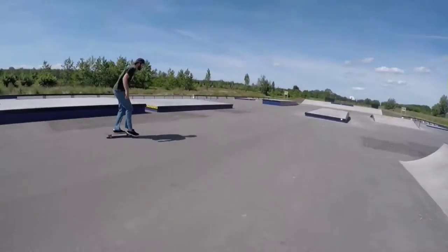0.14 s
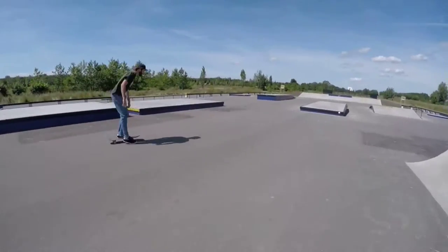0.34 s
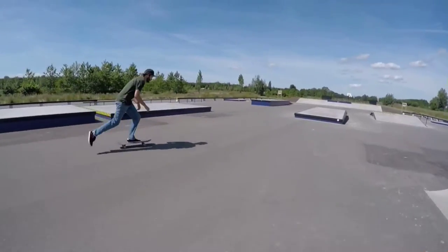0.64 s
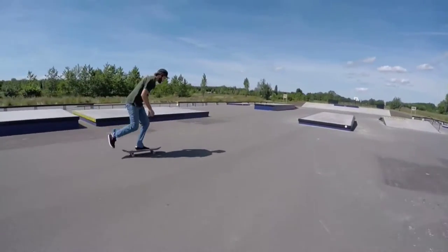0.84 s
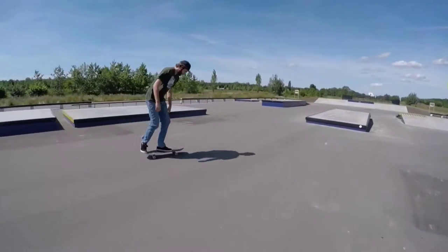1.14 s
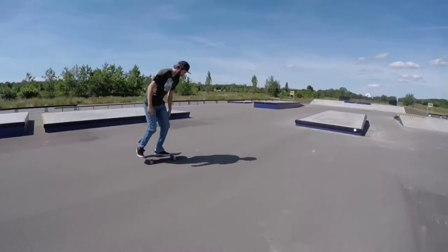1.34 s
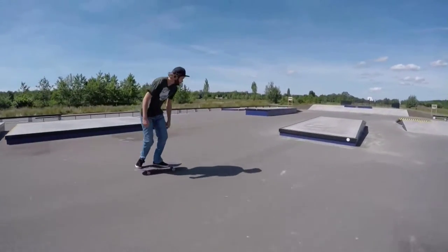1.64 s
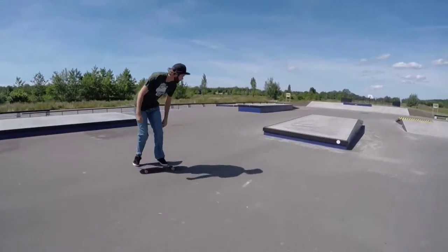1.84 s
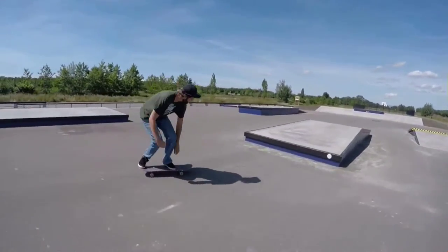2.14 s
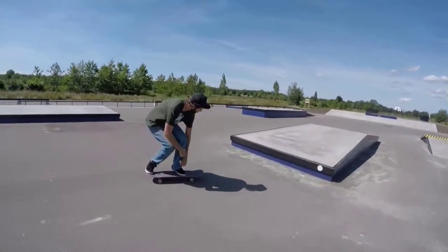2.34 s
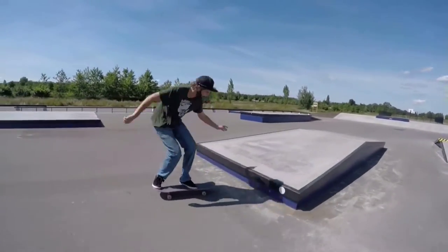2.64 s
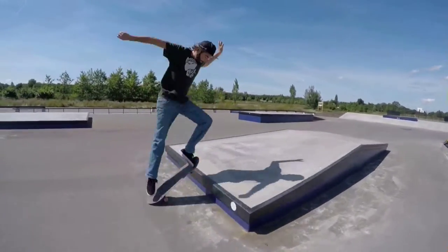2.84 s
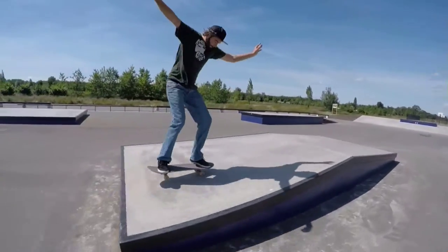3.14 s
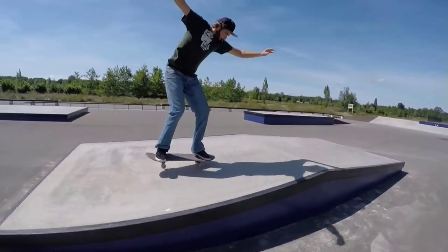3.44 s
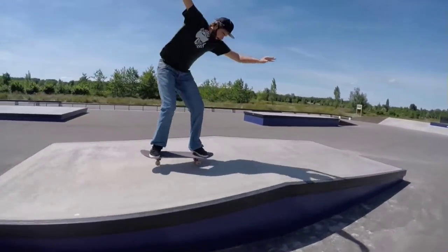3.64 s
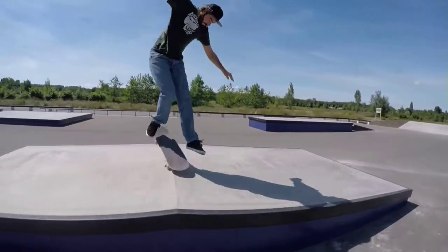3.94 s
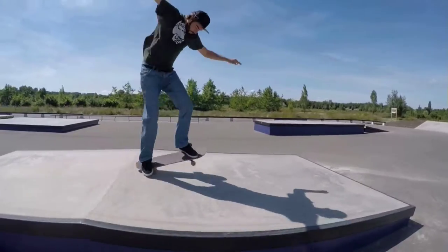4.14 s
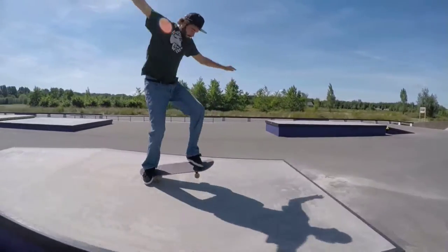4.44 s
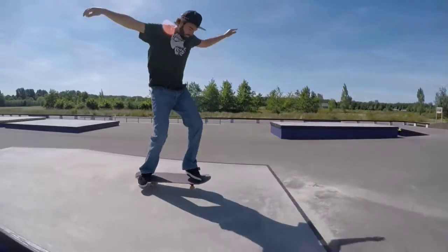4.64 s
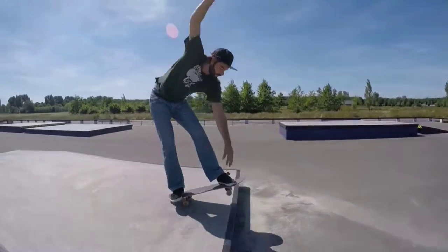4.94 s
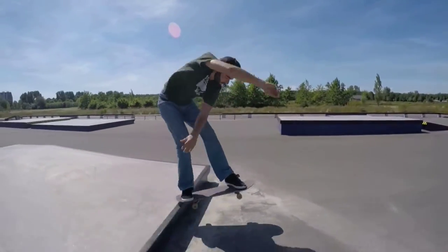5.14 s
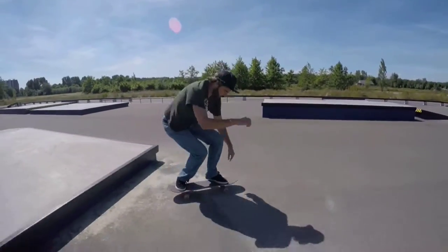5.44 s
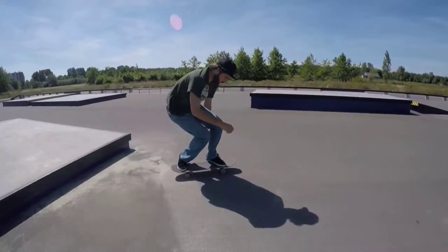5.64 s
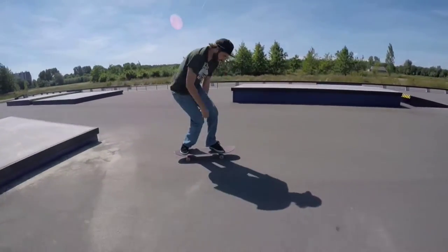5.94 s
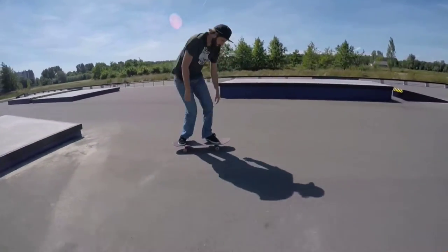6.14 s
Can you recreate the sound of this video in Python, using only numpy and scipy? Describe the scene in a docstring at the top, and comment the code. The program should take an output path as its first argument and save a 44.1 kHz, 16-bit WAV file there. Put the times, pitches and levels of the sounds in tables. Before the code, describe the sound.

Loud plastic clicks and rasps of a camera case rattle over a skateboard's quiet rolling on concrete, with a few clacking board hits outdoors.

```python
"""Skateboarding with a hand-held camera

A skateboarder rolls over smooth concrete, hops onto a low ledge, flips the board and drops off again.
A hand-held action camera follows: its plastic case knocks and chafes in the mount, far louder than the board.
Sharp pushes ring the case; tiny slips make it rasp. Board blows are bursts of noise over a low thud.
Wheels, shoes, clothes, wind and a faint hiss are coloured noise.
"""
import sys
import numpy as np
from scipy import signal
from scipy.fft import rfft, irfft
from scipy.io import wavfile

SR = 44100
rng = np.random.default_rng(int(sys.argv[2]) if len(sys.argv) > 2 else 0)


def master(y):
    """Save y as 16-bit WAV."""
    cut = np.clip(np.atleast_2d(y).T, -1, 1)
    pcm = np.round(cut * 32767)  # scale
    wavfile.write(sys.argv[1], SR, pcm.astype(np.int16))


N = 277830  # samples, 6.3 s
TIME = np.arange(N) / SR


def from_db(db):
    """Decibels to gain."""
    return 10 ** (np.asarray(db) / 20)


def rms_one(x):
    """Scale to an average (rms) strength of 1."""
    return x / np.sqrt(np.mean(x ** 2) + 1e-20)


def in_time(rows):
    """One curve per column, joined by straight lines."""
    s, *columns = np.transpose(rows)
    return [np.interp(TIME, s, column) for column in columns]


def add(out, s, sound):
    """Mix a sound in at its moment."""
    start = max(round(s * SR), 0)
    out[start:start + len(sound)] += sound[:max(N - start, 0)]


def butter(hz, kind, order=2):
    """Sections of a Butterworth low- or high-pass filter."""
    return signal.butter(order, min(hz, .45 * SR), kind, fs=SR, output="sos")


def cut(x, hz, kind, order=2):
    """Low- or high-pass a sound."""
    return signal.sosfilt(butter(hz, kind, order=order), x)


def drift(rate):
    """Smooth chance with spread 1, changing about rate times a second."""
    steps = 4096
    hz = np.fft.rfftfreq(steps, N / SR / steps)
    spectrum = rfft(rng.standard_normal(steps))
    slow = irfft(spectrum / (1 + (hz / rate) ** 2))
    return np.interp(TIME, np.linspace(0, N / SR, steps), rms_one(slow))


def noise(spectrum):
    """Noise of a given colour that falls away beyond its ends; rms 1."""
    hz = np.fft.rfftfreq(N, 1 / SR) + 1e-3  # avoids log(0)
    at, db = np.transpose(spectrum)
    colour = from_db(np.interp(np.log(hz), np.log(at), db))
    ends = np.minimum(1, np.minimum(hz / at[0], at[-1] / hz)) ** 2
    return rms_one(irfft(rfft(rng.standard_normal(N)) * colour * ends, N))


def resonate(x, hz, width_hz):
    """A resonance with gain 1 at its top; a narrower one rings longer."""
    r = np.exp(-np.pi * width_hz / SR)
    top = np.array([1, 0, -1]) * (1 - r * r) / 2
    ringing = [1, -2 * r * np.cos(2 * np.pi * hz / SR), r * r]
    return signal.lfilter(top, ringing, x + 1e-18)


def stroke(s, length, power=2):
    """Samples and gain of one stroke, at half height over its length; a higher power flattens its top."""
    near = slice(max(int((s - 2 * length) * SR), 0), int((s + 2 * length) * SR))
    return near, .5 ** (np.abs(2 * (TIME[near] - s) / length) ** power)


def hiss(level_db=-68.0, hz=4100, width_hz=800):
    """A faint steady hiss with a narrow, boxy colour: noise through the same resonance twice."""
    once = resonate(rng.standard_normal(N), hz, width_hz)
    return from_db(level_db) * rms_one(resonate(once, hz, width_hz))


# air on the microphone: (time [s], relative buffeting level [dB], relative flutter level [dB])
WIND_LEVELS = [(0, -31, -39.5), (.3, -37, -42), (.75, -40.5, -39.5), (1.1, -41.5, -42.5),
               (2.4, -39.5, -40.5), (3.15, -40.5, -44.5), (3.8, -35, -38), (4.4, -35, -40),
               (5.15, -35.5, -45), (5.47, -31.5, -44), (5.8, -33.5, -45), (5.95, -29, -42),
               (6.16, -51, -48), (6.3, -33.5, -52)]
# colour of the slow buffeting: (frequency [Hz], relative density [dB per Hz])
BUFFET_COLOUR = [(15, -17), (30, -3), (50, -11.5), (80, -17.5), (160, -50)]
# colour of the quicker flutter: (frequency [Hz], relative density [dB per Hz])
FLUTTER_COLOUR = [(40, -8.5), (75, 0.5), (110, -2), (170, -3.5), (250, -14), (400, -27), (700, -42),
                  (1500, -24)]


def wind(buffet_level_db=2.0, flutter_level_db=0.0, lumpy_db=3.0):
    """Slow buffeting and a quicker, lumpy flutter of the air stream."""
    buffet_db, flutter_db = in_time(WIND_LEVELS)
    buffet = from_db(buffet_db + buffet_level_db) * noise(BUFFET_COLOUR)
    flutter_gain = from_db(flutter_db + flutter_level_db + lumpy_db * drift(37))
    return buffet + flutter_gain * noise(FLUTTER_COLOUR)


# shoes and clothes brush: (middle time [s], relative level [dB], length at half height [s])
BRUSH_STROKES = [(0.018, -30.5, 0.039), (0.259, -42.5, 0.031), (0.43, -51.5, 0.075), (0.759, -41, 0.06),
                 (0.879, -49, 0.1), (5.938, -48, 0.028), (6.281, -45.5, 0.1)]
# colour of the brushing: (frequency [Hz], relative density [dB per Hz])
BRUSH_COLOUR = [(400, -19), (900, 3), (1600, 0), (3800, -3), (5500, -11), (8500, -16.5), (12500, -19.5),
                (16000, -26)]


def brushes(level_db=0.0, grain_db=-1.5):
    """Soles and cloth give short grainy swishes."""
    gain = np.zeros(N)
    for s, db, length in BRUSH_STROKES:
        near, shape = stroke(s, length, power=2.8)
        gain[near] += from_db(db) * shape
    grain = from_db(level_db + grain_db * drift(140))
    return gain * grain * noise(BRUSH_COLOUR)


# wheels on concrete: (time [s], relative roar level [dB], relative grit hiss level [dB])
ROLL_LEVELS = [(0, -42.5, -50.5), (1.1, -44, -60), (1.5, -45, -56), (2.2, -43.5, -61), (2.75, -47.5, -53.5),
               (3.14, -47, -59), (4.45, -48, -60), (4.85, -49, -48.5), (5.15, -48, -57),
               (5.52, -46.5, -49.5), (5.85, -49, -56.5), (6.3, -54, -62)]
# colour of the roar: (frequency [Hz], relative density [dB per Hz])
ROAR_COLOUR = [(300, 11), (550, 0.5), (900, 9.5), (1300, 6), (1850, 10), (2400, 3.5), (3200, -9),
               (4000, 3.5), (5000, -34), (7000, -49)]
# colour of the grit: (frequency [Hz], relative density [dB per Hz])
GRIT_COLOUR = [(3000, 13.5), (5500, 1), (6800, -2.5), (8200, -7.5), (11000, -6), (16000, -7)]


def wheels(roar_level_db=-7.0, grit_level_db=-5.5, uneven_db=6.0, grain_db=2.5):
    """Wheels roar on the concrete, wavering with the surface, and crackle on its grit."""
    roar_db, grit_db = in_time(ROLL_LEVELS)
    roar = from_db(roar_db + roar_level_db + uneven_db * drift(22.4)) * noise(ROAR_COLOUR)
    grit = from_db(grit_db + grit_level_db + grain_db * drift(120)) * noise(GRIT_COLOUR)
    return roar + grit


# board and shoes hit the concrete: (time [s], relative clatter level [dB],
# clatter's time to fade by 60 dB [s], thud level [dB], thud pitch [Hz])
BOARD_BLOWS = [(0.726, -51, .08, -21, 175), (3.063, -29.5, 0.094, -29, 294),
               (3.074, -26.5, 0.015, -35, 265), (4.166, -29.5, 0.078, -41, 212),
               (5.321, -21, 0.058, -58, 300), (5.327, -26, 0.025, -20, 227),
               (5.333, -22.5, 0.057, -57, 218), (5.934, -27.5, 0.035, -30, 128)]
# colour of deck and wheels on concrete: (frequency [Hz], relative density [dB per Hz])
CLACK_COLOUR = [(300, -10.5), (500, -16.5), (850, -14.5), (1200, -3), (1600, -6), (2100, -6), (2600, -15),
                (3900, -13.5), (6500, -30.5), (8300, -31), (16000, -48)]


def board(clatter_db=5.0, thud_width_hz=50, tail_db=-24, tail_t60=0.075):
    """A blow is a dying clatter of deck and wheels over a low thud, with a faint tail off the concrete."""
    out = np.zeros(N)
    t = TIME[:SR // 3]
    clack = noise(CLACK_COLOUR) * from_db(clatter_db * drift(150))
    for s, db, t60, thud_db, thud_hz in BOARD_BLOWS:
        fade = from_db(-60 * t / t60) + from_db(tail_db - 60 * t / tail_t60)
        clatter = fade * np.roll(clack, -round(s * SR))[:len(t)]
        thud = np.sin(2 * np.pi * thud_hz * t) * np.exp(-np.pi * thud_width_hz * t)
        add(out, s, from_db(db) * clatter + from_db(thud_db) * thud)
    return out


# every rub rasps near one pitch, higher or lower with the grip
RASP_HZ, RASP_SPREAD_OCTAVES = 1867, .13
# the case chafes as the hand jolts the camera:
# (middle time [s], relative level [dB], length at half height [s])
CASE_RUBS = [(0.018, -28, 0.049), (0.143, -24, 0.026), (0.37, -39.5, 0.068), (0.495, -26.5, 0.045),
             (0.673, -33.5, 0.035), (0.923, -26.5, 0.019), (1.002, -27.5, 0.014), (1.076, -36.5, 0.037),
             (1.334, -42, 0.045), (1.422, -24, 0.018), (1.523, -33, 0.05), (1.659, -34.5, 0.041),
             (1.744, -28, 0.032), (1.947, -38.5, 0.093), (2.156, -34, 0.025), (2.43, -33, 0.024),
             (2.514, -35.5, 0.055), (2.663, -31.5, 0.057), (2.9, -27.5, 0.033), (3.034, -41, 0.04),
             (3.19, -27, 0.02), (3.259, -36, 0.034), (3.324, -27, 0.027), (3.476, -35, 0.063),
             (3.754, -37.5, 0.069), (3.904, -32, 0.055), (4.06, -30.5, 0.02), (4.126, -31.5, 0.025),
             (4.183, -35, 0.028), (4.441, -41, 0.076), (4.743, -41.5, 0.036), (4.926, -42, 0.25),
             (5.294, -29.5, 0.019), (5.991, -42, 0.15), (6.059, -26.5, 0.016)]
# what the case rings with, when rubbed or knocked: (frequency [Hz], width [Hz], relative level [dB])
CASE_MODES = [(823, 163, -5.5), (1156, 160, -6.5), (1427, 327, -3), (1779, 124, 4.5), (1989, 60, -2.5),
              (2228, 150, 1), (2563, 84, -3), (2850, 177, -6), (3710, 165, -6.5), (4150, 158, -14),
              (4756, 140, -24), (5860, 210, -32), (6450, 360, -37), (7800, 140, -92), (10570, 400, -45.5),
              (14000, 880, -45)]


def chafing(level_db=2.5, slips_per_s=1000, size_db=6.0, wander_db=6.0, rasp_width_hz=420,
            rasp_db=4.5, case_db=8.0, soft_hz=4200, low_cut_hz=680):
    """Plastic sticks and slips in tiny steps that ring the case; each rub also rasps at a pitch set by its grip."""
    happens = rng.random(N) < slips_per_s / SR
    direction = rng.choice([-1, 1], N)
    size = from_db(size_db * np.minimum(rng.exponential(1, N), 4))
    slips = cut(cut(happens * direction * size, soft_hz, "low"), low_cut_hz, "high")
    rings = np.zeros(N)
    for k, (hz, width_hz, db) in enumerate(CASE_MODES):
        wandering_gain = from_db(db + wander_db * drift(8.8))
        rings += (-1) ** k * wandering_gain * resonate(slips, hz, width_hz)
    out = np.zeros(N)
    for s, db, length in CASE_RUBS:
        near, shape = stroke(s, length)
        pitch_hz = RASP_HZ * 2 ** (RASP_SPREAD_OCTAVES * rng.standard_normal())
        rasp = cut(resonate(slips[near], pitch_hz, rasp_width_hz), 2 * pitch_hz, "low")
        ring_part = from_db(case_db) * rms_one(rings[near])
        rasp_part = from_db(rasp_db) * rms_one(rasp)
        rub = shape * (ring_part + rasp_part)
        out[near] += from_db(db + level_db) * rms_one(rub) * np.sqrt(np.mean(shape ** 2))
    return out


LEAD_S = .015  # room for the case to slide before it strikes


def contact(db, gap_s=0.001117, rebound_db=-5.0, hard_db=-12.5, light_loss=0.11, soft_hz=4500,
            scuff_db=-30.5, slide_s=0.00068, settle_s=0.0037, count=4):
    """Force of one knock: the case slides in, strikes, rebounds (less after a light knock) and scuffs to rest."""
    t = TIME[:SR // 12] - LEAD_S
    strike = int(LEAD_S * SR)
    scuff_shape = np.exp(np.minimum(t / slide_s, -t / settle_s))
    force = from_db(scuff_db) * scuff_shape * rng.standard_normal(len(t))
    lags = np.cumsum(gap_s * rng.uniform(0.16, 1.486, count))
    # each rebound loses this much again
    loss_db = min(rebound_db + light_loss * (db - hard_db), -1)
    rebounds = from_db(loss_db * np.arange(1, count + 1)) * rng.choice([-1, 1], count)
    force[strike + (lags * SR).astype(int)] += rebounds
    force = cut(force, soft_hz, "low", order=1)
    force[strike] += 1  # the strike itself stays sharp
    return force


# after a knock the case drops back and ticks softly, however hard the knock was
BOUNCE_MIN_S, BOUNCE_MAX_S, BOUNCE_DB, BOUNCE_SPREAD_DB = 0.00396, .012, -37.5, 3.5
# a rub shakes loose a tick, this far above the rub's listed level; ticks and bounces have little snap
RATTLE_DB, LIGHT_SNAP_DB = 2, -7


def light_knocks():
    """Every knock bounces once and every rub has one loose tick: (time [s], level [dB], treble snap [dB])."""
    light = []
    for s, _, _ in CASE_KNOCKS:
        moment = s + rng.uniform(BOUNCE_MIN_S, BOUNCE_MAX_S)
        light.append((moment, BOUNCE_DB + BOUNCE_SPREAD_DB * rng.standard_normal(), LIGHT_SNAP_DB))
    for s, db, length in CASE_RUBS:
        moment = s + length * rng.uniform(-0.15, .5)
        light.append((moment, db + RATTLE_DB, LIGHT_SNAP_DB))
    return light


BODY_PER_SNAP = 0.083  # a snappier knock wakes the low modes more (dB per dB of snap)
# the case knocks in its mount: (time [s], level [dB], treble snap [dB])
CASE_KNOCKS = [(0.1407, -19.5, 23), (0.147, -13.5, 23), (0.153, -21, 15.5), (0.3837, -30, 2),
               (0.4641, -20, 15), (0.501, -12.5, 19), (0.5634, -25, 1), (0.5737, -19.5, 17),
               (0.604, -25.5, 0), (0.6486, -13, 19), (0.678, -15, 4), (0.7156, -15, 18), (0.7857, -30, 7),
               (0.8238, -29.5, -27), (0.8827, -29, -8), (0.91, -18.5, 22), (0.9414, -20.5, -6), (1, -23, 2),
               (1.0617, -21, 6), (1.1759, -20.5, -1), (1.4284, -22, -15), (1.4466, -28.5, -28),
               (1.4926, -10, 5), (1.647, -17, 17), (1.6863, -22.5, -5), (1.7205, -11, 5), (1.7415, -14, 12),
               (1.781, -30.5, -6), (1.8456, -15.5, 17), (1.9718, -21.5, 16), (2.0846, -12.5, 18),
               (2.15, -19, 13), (2.1634, -18, 15), (2.183, -14, 19), (2.2322, -31, -20),
               (2.2631, -15.5, 22), (2.2977, -22, 8), (2.3346, -17.5, 17), (2.4084, -22, 9),
               (2.4378, -13.5, -1), (2.545, -14.5, 15), (2.6422, -13.5, 23), (2.8183, -24, 16),
               (2.8475, -9.5, 13), (2.895, -16.5, 15), (2.9203, -12, 14), (2.9522, -21, -12),
               (3.0001, -27, 8), (3.1792, -20, 17), (3.274, -14, 5), (3.3158, -17.5, 19), (3.3425, -18, 22),
               (3.368, -35, -19), (3.3841, -21.5, 8), (3.394, -16, 18), (3.409, -20.5, -25),
               (3.427, -17, 23), (3.487, -15, 18.5), (3.6097, -19.5, 7), (3.6296, -16, 14),
               (3.684, -25.5, -15), (3.7322, -12, 21), (3.7556, -17, 20), (3.7657, -22.5, -22),
               (3.8095, -15.5, -15), (3.9038, -17.5, 19.5), (3.9862, -29.5, 22), (4.1063, -16, 24),
               (4.1251, -16, 20), (4.1343, -16.5, 23), (4.155, -21.5, 5), (4.213, -14, 15),
               (4.2576, -19.5, -8), (4.3093, -26, -37), (4.431, -18.5, -54), (4.6381, -15, 8),
               (4.6928, -16.5, 2), (4.923, -15, 29), (5.0342, -26, -39), (5.2185, -26.5, -14),
               (5.284, -20, 18), (5.3654, -11.5, 5), (5.5001, -30.5, -29), (5.52, -22.5, -29),
               (5.5463, -27, -15), (5.7003, -11, 24), (6.0553, -9.5, 29)]
# strength of the low modes in the knocks, before the share from snap: (time [s], level [dB])
KNOCK_BODY = [(0, 0.5), (1.5, 3), (2.4, -0.5), (2.9, -5), (3.2, 3), (4.3, -1), (4.6, 3.5), (6.3, 2.5)]


def knocks(level_db=0.0, scatter_db=2.5, detune=0.014, snap_hz=5000, body_hz=1250,
           low_cut_hz=680, high_cut_hz=8200):
    """Each knock rings the case; where it lands shifts the strength and, slightly, the pitch of every mode."""
    hz, width_hz, mode_db = np.transpose(CASE_MODES)
    signs = (-1) ** np.arange(len(hz))
    strike = int(LEAD_S * SR)
    attack = slice(strike, strike + SR // 184)  # the first 5 ms set the level
    # the small case radiates no bass, and plastic swallows the highest treble
    shell = np.vstack([butter(low_cut_hz, "high", order=3), butter(high_cut_hz, "low")])
    out = np.zeros(N)
    for s, db, snap_db in CASE_KNOCKS + light_knocks():
        force = contact(db)
        # a snappier contact wakes the high modes, and slightly the low ones,
        # whose strength also drifts over time
        body_db = np.interp(s, *np.transpose(KNOCK_BODY)) + BODY_PER_SNAP * snap_db
        colour_db = snap_db / (1 + (snap_hz / hz) ** 4) + body_db / (1 + (hz / body_hz) ** 8)
        scattered_db = scatter_db * rng.standard_normal(len(hz))
        gains = signs * from_db(mode_db + colour_db + scattered_db)
        pitches = hz * (1 + detune * rng.standard_normal(len(hz)))
        modes = sum(g * resonate(force, f, w) for g, f, w in zip(gains, pitches, width_hz))
        ring = signal.sosfilt(shell, modes)
        add(out, s - LEAD_S, from_db(db + level_db) * ring / np.std(ring[attack]))
    return out


def scene():
    """Everything reaches the one microphone, in the open air."""
    background = hiss() + wind()
    skating = brushes() + wheels() + board()
    camera_case = chafing() + knocks()
    return (background + skating + camera_case)[None, :]


def record(dry, overload=.49, cutoff_hz=15800):
    """The hardest knocks overload and are rounded; the top is cut."""
    rounded = dry / (1 + (dry / overload) ** 8) ** (1 / 8)
    top_cut = signal.ellip(10, .1, 80, cutoff_hz, fs=SR, output="sos")
    return signal.sosfilt(top_cut, rounded)


dry = scene()
out = record(dry)
master(out)
```